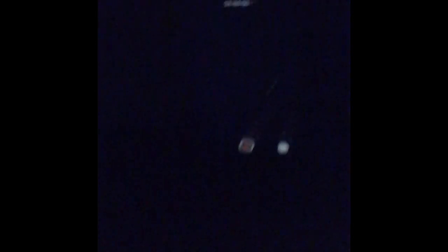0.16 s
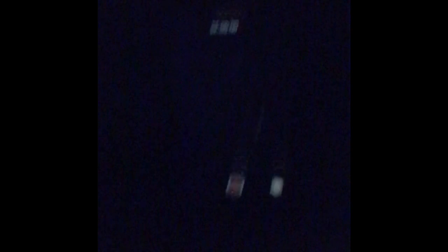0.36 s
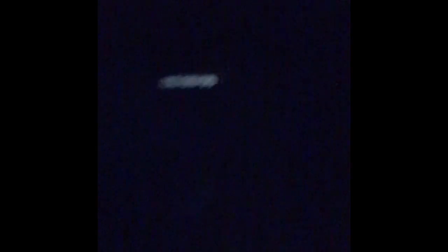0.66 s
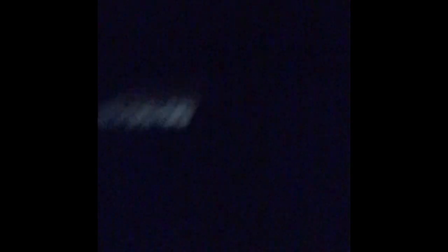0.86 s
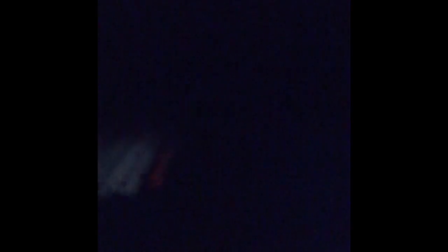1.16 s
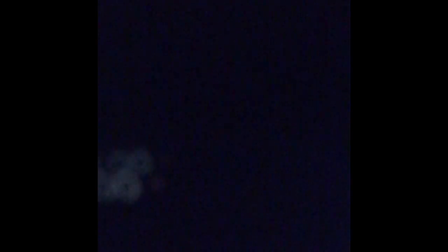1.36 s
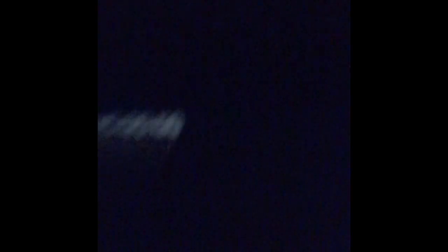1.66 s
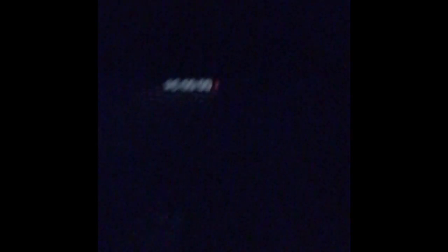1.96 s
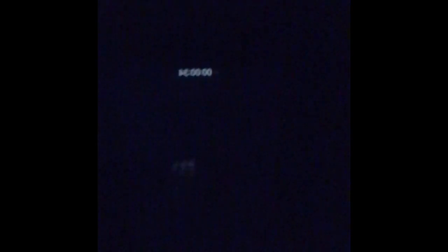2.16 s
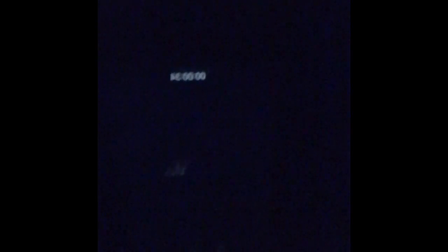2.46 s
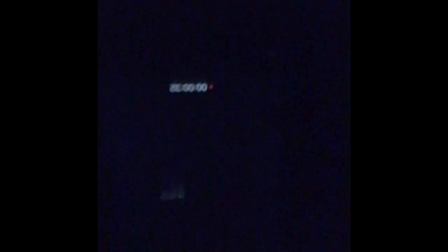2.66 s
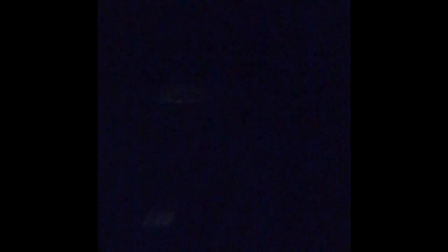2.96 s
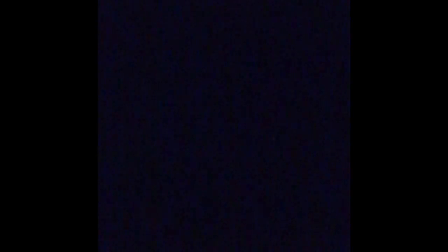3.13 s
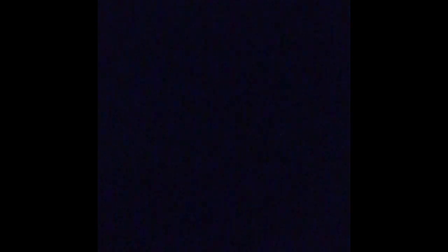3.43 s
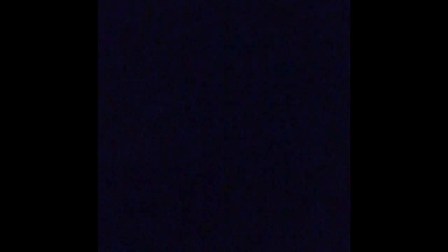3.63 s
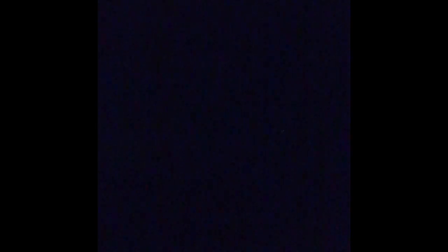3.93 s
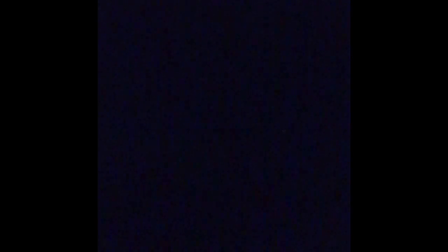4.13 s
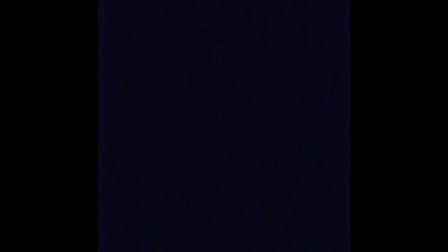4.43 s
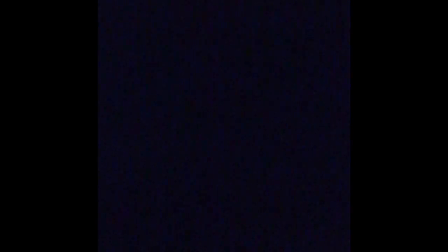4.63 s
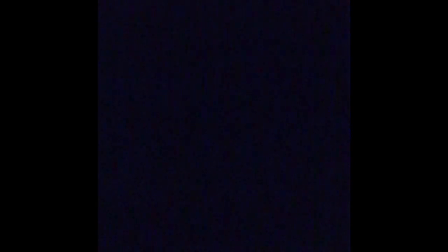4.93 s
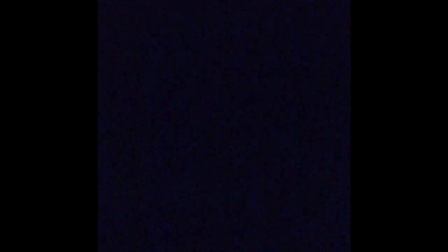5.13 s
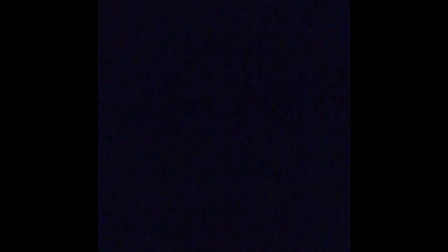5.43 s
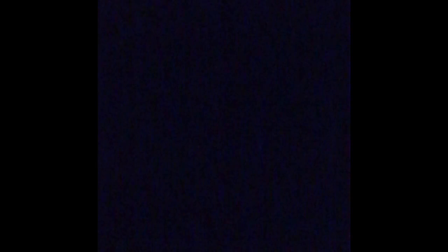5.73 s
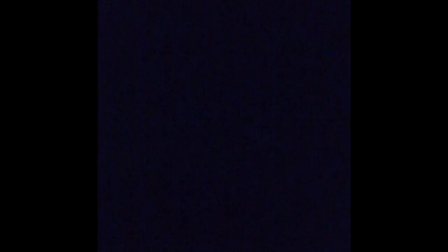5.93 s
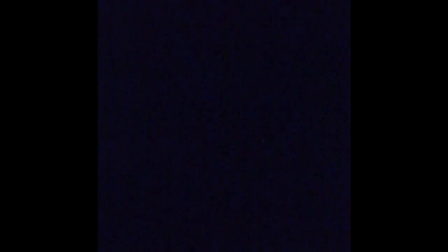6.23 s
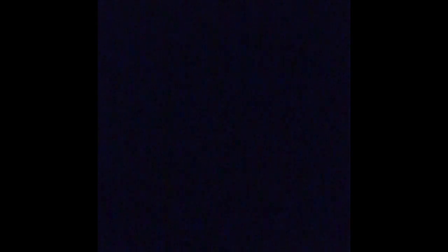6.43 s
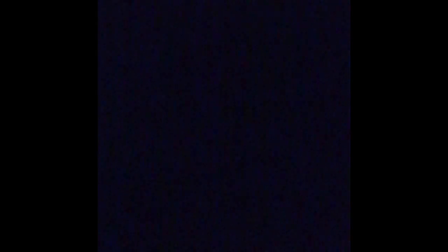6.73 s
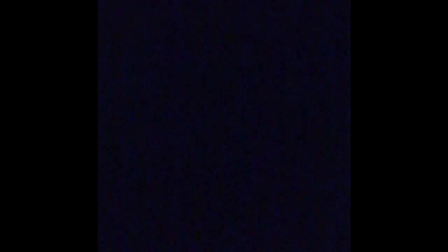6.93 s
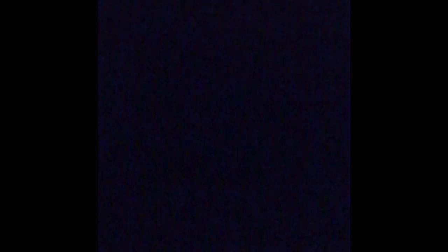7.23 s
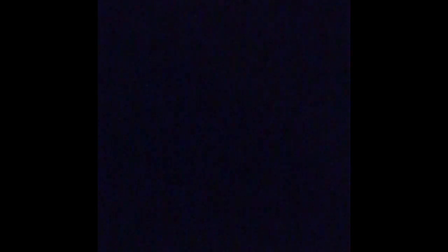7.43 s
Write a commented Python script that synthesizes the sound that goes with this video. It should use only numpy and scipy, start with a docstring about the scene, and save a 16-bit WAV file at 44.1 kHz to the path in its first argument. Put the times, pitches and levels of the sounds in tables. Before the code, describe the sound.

Close, dry cabin sound with a low hum. Soft cloth rubbing and light taps lead to one loud, rattling clunk. A window motor drones steadily for over a second while glass hisses in its rubber seal, then stops. In the quiet gap, thin high insect trills and a low distant drone come from outside. A double knock precedes a second, deeper, wavering motor run.

```python
"""Inside a parked car at night: a hand brushes the door, the window motor frees the glass with a clunk and
lowers it, stops, and later winds it up again. The motor is a stack of sine tones tied to its shaft angle,
the glass hissing in its seal and the rubbing cloth are shaped noise, and knocks are dying bursts.
Insects sing through the open gap as narrow noise bands and a drifting whistle.
Under it all the cabin hums, rumbles and hisses."""
import sys
import numpy as np
from scipy import signal
from scipy.fft import rfft, irfft, next_fast_len
from scipy.io import wavfile
from scipy.ndimage import uniform_filter1d, map_coordinates

SR = 44100
rng = np.random.default_rng(int(sys.argv[2]) if len(sys.argv) > 2 else 0)


def to_wav(s):
    """Save 16-bit WAV."""
    ch = np.atleast_2d(s).T  # columns
    pcm = np.round(np.clip(ch, -1, 1) * 32767)  # PCM
    wavfile.write(sys.argv[1], SR, pcm.astype(np.int16))


N = 334939

# the cabin's three layers over time: (t/s, rumble level/dB, hum level/dB, hiss level/dB)
CABIN_LEVELS = [(0, -53.5, -55.5, -64.5), (.9, -52, -49.5, -64.5), (1.8, -53, -51, -66),
                (2.5, -48.5, -57, -66.5), (4.0, -50.5, -68, -59.5), (4.4, -49.5, -72, -64),
                (7.59, -50, -65, -63)]
# tone colour of the cabin rumble: (f/Hz, relative level/dB)
RUMBLE_COLOUR = [(15, -20), (30, -10), (72, -2), (115, -13.5), (160, -5.5), (270, -15), (600, -27.5),
                 (1500, -39.5)]
# steady tones of the cabin hum: (f/Hz, relative level/dB)
HUM_TONES = [(129, -6.5), (204, -9.5), (258, -2)]
# throbbing upper tones of the cabin hum: (f/Hz, relative level/dB)
THROBBING_TONES = [(608, -12), (890, -24), (1240, -29.5)]
# tone colour of the cabin hiss: (f/Hz, relative level/dB)
HISS_COLOUR = [(400, -11), (750, -6), (1200, -13), (2400, -18), (6000, -24), (15800, -31.5)]
# cloth and fingers rubbing:
# (start t/s, loudest t/s, end t/s, level/dB, low part relative level/dB, bright part relative level/dB)
RUBS = [(1.593, 1.707, 1.755, -56, -22, -4), (1.622, 1.654, 1.676, -51.5, -22, -12),
        (1.74, 1.917, 2.02, -63.5, 3.5, 1), (1.946, 1.987, 2.01, -55, 9, 5.5),
        (1.988, 2.11, 2.244, -56, -2.5, 1), (2.227, 2.288, 2.37, -67.5, -16, -2.5),
        (2.407, 2.448, 2.59, -64.5, 7.5, -6), (4.134, 4.254, 4.3, -61, 9.5, -24)]
# tone colour of the bright part of a rub: (f/Hz, relative level/dB)
CLOTH_COLOUR = [(3000, -6.5), (6000, 1), (9000, 1), (13500, -3.5), (15800, -25)]
# soft booms of the car body: (middle t/s, f/Hz, level/dB, half-length/s)
BODY_BOOMS = [(1.876, 190, -35, 0.0075), (1.912, 80, -39.5, 0.025), (2.113, 86.5, -31.5, 0.024),
              (2.618, 72, -22, 0.012)]
# knocks in the door: (t/s, overall level/dB, thump relative level/dB, treble relative level/dB,
# time to fall by 60 dB/s, ring of the part that is hit f/Hz, ring relative level/dB)
KNOCKS = [(1.862, -42, -2.5, -17, 0.06, 403, 9), (1.892, -45, -2.5, 6, 0.05, 700, -3),
          (2.088, -44, -5, 2, 0.053, 3290, -3), (2.436, -52, 5.5, 3, 0.058, 3170, -3),
          (2.524, -34, -17, 6.5, 0.047, 500, 0), (2.531, -15, -12.5, 1, 0.062, 653, -3.5),
          (2.546, -16, -18, 5, 0.055, 566, -8), (2.554, -28, -4.5, 2, 0.21, 420, 2),
          (2.555, -23, -17, 8, 0.026, 2260, 0.5), (2.594, -16.5, -8, 0, 0.08, 695, -3),
          (2.599, -15, -16, 2, 0.065, 1098, -1.5), (2.621, -30, 0, 5.5, 0.28, 458, -6),
          (2.653, -37.5, 1.5, 7.5, 0.23, 340, -8), (2.672, -31.5, -5, 1, 0.077, 3900, -2.5),
          (2.7, -42, -1, 4, 0.3, 250, 0), (2.816, -41.5, 0.5, 10, 0.064, 3460, -3),
          (2.905, -43.5, -1, 10.5, 0.054, 3170, 2), (4.047, -44, -20, 4, 0.049, 1550, 1.5),
          (4.064, -36, -3, 6.5, 0.047, 583, 5.5), (4.149, -47, -1, -2, 0.09, 4100, 2),
          (4.198, -44.5, -0.5, -2, 0.24, 540, -1), (4.255, -46.5, 2, 0, .1, 2970, -8),
          (5.73, -47, -4, 4.5, 0.05, 1180, -4.5), (6.081, -37, -6.5, -2, 0.21, 603, -2.5),
          (6.092, -30.5, -7.5, 5, 0.045, 390, 4)]
# resonances of the door skin: (f/Hz, width/Hz, relative level/dB)
DOOR_SKIN = [(107, 93, -0.5), (171, 27, 3.5), (243, 61, -4.5), (371, 174, -7)]
# resonances of the door trim: (f/Hz, width/Hz, relative level/dB)
DOOR_TRIM = [(593, 205, -1), (1030, 500, -2.5), (1660, 650, -7)]
# tone colour of the crack in a knock: (f/Hz, relative level/dB)
CRACK_COLOUR = [(1800, -16), (2600, -6), (3900, -1.5), (6500, -10), (12000, -21), (15800, -28)]
# motor runs, down then up: (start t/s, end t/s, mean shaft speed f/Hz, peak of the twice-a-turn swing t/s,
# swing twice a drum turn f/Hz, swing once a drum turn f/Hz, drop from the ends to mid travel f/Hz)
MOTOR_RUNS = [(2.698, 4.055, 128.3, 3.825, 1.55, 0.845, 4.1), (6.131, 7.592, 101.1, 7.195, 2.04, 1.47, .6)]
# steady tones at multiples of the shaft speed: (multiple, level going down/dB, level going up/dB)
SHAFT_TONES = [(1, -54, -56), (2, -50, -65), (3, -56.5, -58), (4, -62.5, -57.5), (5, -65.5, -62.5),
               (6, -69, -65), (8, -75, -65), (11, -69.5, -65)]
# a multiple of the shaft speed sings out for a while during the run:
# (multiple, start t/s, end t/s, level/dB); it is silenced early if the motor run is over
SINGING_TONES = [(3, 2.88, 3.75, -53), (6, 3.28, 3.54, -58), (10, 3.25, 3.8, -64), (2, 3.8, 5.1, -51),
                 (4, 3.77, 4.08, -53), (8, 6.18, 6.68, -54), (3, 6.42, 9.6, -52.5), (4, 6.45, 8.5, -54.5),
                 (2, 6.65, 7.62, -49.5), (11, 6.7, 7.13, -62), (6, 6.84, 7.34, -51.5), (16, 6.88, 7.1, -60),
                 (8, 7.05, 7.4, -51.5), (4, 7.09, 7.33, -50), (22, 7.2, 7.62, -58.5),
                 (16, 7.24, 7.7, -57.5), (9, 6.64, 7.12, -59), (7, 7.03, 7.7, -60)]
# glass dragging in the seal, one list going down and one going up:
# (t/s, hiss level/dB, brightness relative level/dB, ring of the seal's lip relative level/dB)
GLASS_DRAG = ([(2.7, -49, -3, -7), (2.95, -50, -2.5, -1), (3.3, -54.5, -3.5, -0.5),
              (3.65, -55.5, -5.5, -14), (4.04, -63, -13, -13)], [(6.13, -59.5, -13, -18),
              (6.4, -53.5, -7, -18), (6.85, -49.5, -8.5, -13), (7.2, -52, -5, -3), (7.59, -55.5, -1.5, 2)])
# tone colour of the glass hissing in the seal: (f/Hz, relative level/dB)
SEAL_COLOUR = [(300, -33), (600, -13), (2400, -13.5), (4600, -16), (5600, -22.5), (9000, -29.5),
               (13000, -32.5), (15800, -47)]
# two rings of the seal's lip for each run, higher going down than up: (f/Hz, width/Hz)
LIP_RINGS = [
    [(3000, 600), (4050, 1100)],
    [(2350, 900), (3250, 800)],
]
# chorus, chirps and drone heard through the open window: (t/s, base level/dB)
OPEN_GAP = [(3.2, -68), (7.0, -69)]
# phrases of the nearest cricket: (start t/s, end t/s, level/dB)
TRILL_PHRASES = [(3.3, 3.699, -67), (3.73, 4.78, -64.5), (4.826, 5.87, -64.5), (5.908, 6.602, -64.5)]
# narrow bands dimmed by the microphone's housing: (f/Hz, width/Hz, depth from 0 to 1)
MIC_DIPS = [(4700, 460, 0.21), (10400, 500, 0.46)]

SNAP_HZ, SNAP_GROWS = 5370, 0.97  # above this pitch the crack gains extra dB per dB of treble
RING_ROUGH = 0.22  # roughness of a knock's ring per kHz
TURNS_PER_DRUM_TURN, ONCE_LAG_RAD = 80.3, 0.38  # motor shaft to cable drum; lag of the slower swing
SING_FADE_S, RUN_FADE_S = 0.1, 0.082
FAINT_MULTIPLES = range(7, 40)
FAINT_DB, FAINT_WAVER_DB = -20.5, 2.5  # level relative to the seal's hiss, and its slow waver
CHIRP_START_S, CHIRP_EVERY_S, CHIRP_S, CHIRP_COUNT = 4.0, 0.326, 0.22, 8
TOP_HZ = 15750


def amp(db):
    """Turn dB into a plain gain."""
    return 10 ** (np.asarray(db) / 20)


def unit(x):
    """Scale x to an average (rms) strength of 1."""
    return x / np.sqrt(np.mean(x ** 2) + 1e-20)


def curves(rows):
    """Give a gate that is open while the table lasts, and one smooth-running curve per column."""
    s, *columns = np.transpose(rows)
    t = np.arange(N) / SR
    fade_s = 0.03
    gate = np.clip(np.minimum(t - s[0] + fade_s, s[-1] - t + fade_s) / fade_s, 0, 1)
    return gate, [np.interp(t, s, column) for column in columns]


def between(start, end, fade):
    """Make a gate that starts to open at start and is shut again at end."""
    t = np.arange(N) / SR
    return np.clip(np.minimum(t - start, end - t) / fade, 0, 1)


def wobble(rate, count=N):
    """Draw a smooth random curve through rate random points a second."""
    points = rng.standard_normal(int(count * rate / SR) + 4)
    return map_coordinates(points, [np.arange(count) * rate / SR])


def filtered(x, response):
    """Change the strength of each frequency in x by the given response."""
    m = next_fast_len(len(x) + SR // 4)  # spare room lets rings die out
    return irfft(rfft(x, m) * response(np.fft.rfftfreq(m, 1 / SR)), m)[:len(x)]


def shape(points):
    """Join (Hz, dB) points into a tone colour, with pitch spaced as we hear it."""
    f, db = np.transpose(points)
    return lambda hz: amp(np.interp(np.log(hz + 1), np.log(f + 1), db, left=-120, right=-120))


def modes(table):
    """Add up resonances of (Hz, width, dB) with alternating signs; each one rings on after it is struck."""
    def response(f):
        total = 0
        for k, (center, width, db) in enumerate(table):
            damping = 1j * f * width
            total = total + (-1) ** k * amp(db) * damping / (center * center - f * f + damping)
        return total
    return response


def noise(response):
    """Make coloured noise with an rms of 1."""
    return unit(filtered(rng.standard_normal(N), response))


def noise_band(hz, width_hz):
    """Make noise gathered around one pitch."""
    return noise(lambda f: 1 / (1 + ((f - hz) / width_hz) ** 4))


def patchy(x, depth_db):
    """Give x random patches of loudness, about 500 Hz wide and 0.08 s long."""
    spectrum = signal.stft(x, nperseg=512)[2]
    field = uniform_filter1d(rng.standard_normal(spectrum.shape), size=6, axis=0)
    field = uniform_filter1d(field, size=14, axis=1)
    return unit(signal.istft(spectrum * amp(depth_db * unit(field)), nperseg=512)[1][:N])


def wavering_tones(table, blur):
    """Add sine tones that waver in level and phase and sink slowly in pitch."""
    t = np.arange(N) / SR
    sinking_time = t - 0.0044 * t ** 2
    total = np.zeros(N)
    for hz, db in table:
        level = amp(db + 1.4 * wobble(16))
        total += level * np.sin(2 * np.pi * hz * sinking_time + blur * wobble(25))
    return total


def cabin():
    """The cabin: low noise rumbles, wavering tones hum with a throbbing top, and wide noise hisses."""
    _, (rumble_db, hum_db, hiss_db) = curves(CABIN_LEVELS)
    t = np.arange(N) / SR
    throb = 1 + 0.85 * np.sin(2 * np.pi * 29.6 * t + wobble(3.0))
    steady = wavering_tones(HUM_TONES, blur=0.5)
    upper = throb * wavering_tones(THROBBING_TONES, blur=1.3)
    hum = np.sqrt(2) * (steady + upper)
    rumble = noise(shape(RUMBLE_COLOUR))
    hiss = noise(shape(HISS_COLOUR))
    return amp(rumble_db) * rumble + amp(hum_db) * hum + amp(hiss_db) * hiss


def rubs():
    """Cloth and fingers rub the door: grainy noise swells and fades with each stroke."""
    out, t = np.zeros(N), np.arange(N) / SR
    grain = amp(0.64 * wobble(220) + 1.7 * wobble(30))
    body = grain * noise(modes([(2020, 1900, -4.0), (3220, 1200, 5.0)]))
    bright = grain * patchy(noise(shape(CLOTH_COLOUR)), depth_db=2.0)
    low = amp(2.8 * wobble(60)) * noise(modes([(362, 630, 1), (1140, 2530, -6.0)]))
    for start, loudest, end, db, low_db, bright_db in RUBS:
        stroke = np.interp(t, sorted([start, loudest, end]), [0, 1, 0])
        sides = amp(low_db) * low + amp(bright_db) * bright
        out += amp(db) * (stroke * body + stroke ** 0.61 * sides)  # the sides swell sooner
    return out


def body_booms():
    """Loads on the car body make it boom: short low tones that swell and fade evenly."""
    out, t = np.zeros(N), np.arange(N) / SR
    for s, hz, db, half in BODY_BOOMS:
        out += amp(db) * np.exp(-((t - s) / half) ** 2) * np.sin(2 * np.pi * hz * (t - s))
    return out


def knocks():
    """Each knock is a dying burst that thumps the door skin, rings the trim and the part it hits, and cracks."""
    t = np.arange(SR // 4) / SR
    low, mid, high, snap, part = np.zeros((5, N + SR))
    bursts = rng.standard_normal((len(KNOCKS), 4, len(t)))
    for (s, db, thump_db, treble_db, t60, hz, ring_db), burst in zip(KNOCKS, bursts):
        t60 = max(t60, .005)
        fade = amp(db - 60 * t / t60) * (1 - np.exp(-t / 0.00075))
        at = slice(round(s * SR), round(s * SR) + len(t))
        low[at] += amp(thump_db) * fade * burst[0]
        mid[at] += fade * burst[1]
        # treble dies sooner
        high[at] += amp(treble_db - 30 * t / t60) * fade * burst[2]
        snap[at] += amp((1 + SNAP_GROWS) * treble_db - 45 * t / t60) * fade * burst[2]
        smooth_noise = unit(uniform_filter1d(burst[3], round(2 * SR / hz)))
        rough = 1 + RING_ROUGH * hz / 1000 * smooth_noise
        part[at] += amp(ring_db) * fade * rough * np.sin(2 * np.pi * hz * t)

    def upper(f):
        return 1 / (1 + (SNAP_HZ / (f + 1)) ** 6)

    crack_colour = shape(CRACK_COLOUR)
    skin = amp(29) * filtered(low[:N], modes(DOOR_SKIN))
    trim = amp(11.0) * filtered(mid[:N], modes(DOOR_TRIM))
    crack = filtered(high[:N], lambda f: crack_colour(f) * (1 - upper(f)))
    crack += amp(-4) * filtered(snap[:N], lambda f: crack_colour(f) * upper(f))
    return skin + trim + amp(2) * crack + part[:N]


def shaft_turn(start, end, mean_hz, peak_s, twice_hz, once_hz, drop_hz):
    """Shaft angle: the cable drum loads the motor once and twice a turn, the guides most at mid travel."""
    t = np.arange(N) / SR
    drum = 2 * np.pi * mean_hz / TURNS_PER_DRUM_TURN * (t - peak_s)
    travel = np.clip(2 * (t - start) / (end - start) - 1, -1, 1)  # -1 at the start, 1 at the end
    speed_hz = mean_hz + twice_hz * np.cos(2 * drum) + once_hz * np.cos(drum - ONCE_LAG_RAD)
    speed_hz += drop_hz * (travel ** 2 - 1 / 3)  # the 1/3 keeps the mean speed
    unsteady_hz = speed_hz * (1 + 0.002 * wobble(25))
    return 2 * np.pi * np.cumsum(unsteady_hz) / SR + 0.024 * wobble(60)


def motor_hum(run, steady_db, hiss_db):
    """The motor shaft hums through the door at whole multiples of its turning speed."""
    start, end = run[:2]
    turn = shaft_turn(*run)
    gains = {round(row[0]): amp(db) for row, db in zip(SHAFT_TONES, steady_db)}
    for k, on, off, db in SINGING_TONES:
        if start < on < end:
            singing = amp(db) * between(on - SING_FADE_S / 2, off + SING_FADE_S / 2, SING_FADE_S)
            gains[round(k)] = np.hypot(gains.get(round(k), 0), singing)
    hum = np.zeros(N)
    for k, gain in gains.items():
        hum += gain * amp(0.8 * wobble(15)) * np.sin(k * turn + 2 * np.pi * rng.random())
    running = slice(round((start - RUN_FADE_S) * SR), round((end + RUN_FADE_S) * SR))
    for k in FAINT_MULTIPLES:  # they come and go, louder when the glass drags
        waver_db = FAINT_WAVER_DB * wobble(8, count=len(turn[running]))
        level = amp(hiss_db[running] + FAINT_DB + waver_db)
        hum[running] += level * np.sin(k * turn[running] + 2 * np.pi * rng.random())
    return np.sqrt(2) * hum


def gear_whirr():
    """Gear noise in the door: wavering noise coloured by three resonances."""
    return amp(-54.5 + 3.2 * wobble(9)) * noise(modes([(170, 147, -2), (298, 92, 3.5), (560, 230, -7.0)]))


def glass_drag(hiss_db, bright_db, lip_db, lip_rings):
    """Glass scrapes unevenly through its rubber seal: patchy hiss, a ringing lip and a bright edge."""
    def ring_colour(f):
        return sum(abs(modes([(*band, 0)])(f)) ** 2 for band in lip_rings)

    seal_colour = shape(SEAL_COLOUR)
    grain = amp(0.57 * wobble(300))
    # body and edge share the seal's colour, below and above 6000 Hz
    body = patchy(noise(lambda f: seal_colour(f) / np.sqrt(1 + (f / 6000) ** 6)), depth_db=1.7)
    ring = patchy(noise(ring_colour), depth_db=2.5)
    edge = noise(lambda f: seal_colour(f) / np.sqrt(1 + (6000 / (f + 1)) ** 6))
    return amp(hiss_db) * grain * (body + amp(lip_db) * ring + amp(bright_db) * edge)


def window_run(run, steady_db, drag, lip_rings):
    """One trip of the window: motor hum, gear whirr and dragging glass fade in and out together."""
    start, end = run[:2]
    _, (hiss_db, bright_db, lip_db) = curves(drag)
    hum = motor_hum(run, steady_db, hiss_db)
    drag_sound = glass_drag(hiss_db, bright_db, lip_db, lip_rings)
    gate = between(start - RUN_FADE_S, end + RUN_FADE_S, RUN_FADE_S)
    return gate * (hum + gear_whirr() + drag_sound)


def through_gap():
    """Gain of the outdoor sounds that share the open gap."""
    gate, (gap_db,) = curves(OPEN_GAP)
    return gate * amp(gap_db)


def insect_chorus():
    """Many insects blend into a steady high chorus of three noise bands."""
    return noise_band(8105, 460) + amp(-6.0) * noise_band(6330, 530) + noise_band(5540, 410)


def distant_drone():
    """A distant drone comes in with the insects: a narrow band of low noise."""
    return amp(16.0) * noise_band(83.0, 13.7)


def trilling_cricket():
    """The nearest cricket trills in phrases: a drifting wing note with narrow noise around it."""
    phrases = sum(amp(db) * between(start, end, 0.19) for start, end, db in TRILL_PHRASES)
    note_hz = 5350 + 35 * wobble(2.5)
    whistle = np.sin(2 * np.pi * np.cumsum(note_hz) / SR + 0.36 * wobble(230))
    lower_band = amp(-5.0 + 3.6 * wobble(2.3)) * noise_band(4995, 90)
    return phrases * unit(whistle + noise_band(5270, 150) + lower_band)


def chirping_cricket():
    """A farther cricket chirps at even steps: a narrow noise band opened by short gates."""
    starts = CHIRP_START_S + CHIRP_EVERY_S * np.arange(CHIRP_COUNT)
    chirps = sum(between(s, s + CHIRP_S, 0.03) for s in starts)
    return amp(-6.0) * chirps * noise_band(4320, 170)


def scene():
    """Add up everything heard in the cabin."""
    runs = zip(MOTOR_RUNS, np.transpose(SHAFT_TONES)[1:], GLASS_DRAG, LIP_RINGS)
    window = sum(window_run(*run) for run in runs)
    outdoors = through_gap() * (insect_chorus() + distant_drone() + chirping_cricket())
    hand = rubs() + body_booms()
    return (cabin() + hand + knocks() + window + outdoors + trilling_cricket())[None]


def record(dry):
    """The microphone's housing dims two narrow bands; nothing is kept from the top limit up."""
    def colour(hz):
        dips = [1 - depth / (1 + ((hz - center) / width) ** 2) for center, width, depth in MIC_DIPS]
        return np.prod(dips, axis=0)

    return filtered(dry[0], lambda hz: colour(hz) * (hz < TOP_HZ))[None]


dry = scene()
out = record(dry)
to_wav(out)
```